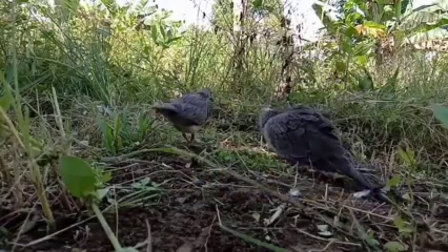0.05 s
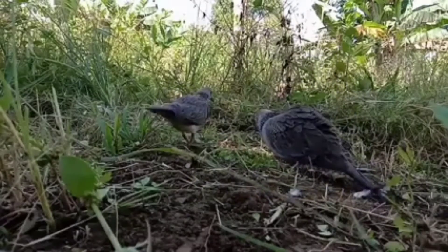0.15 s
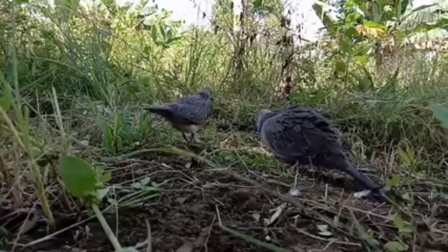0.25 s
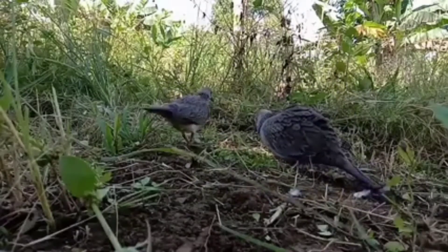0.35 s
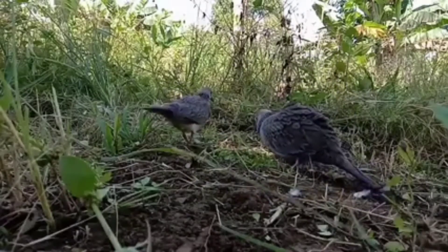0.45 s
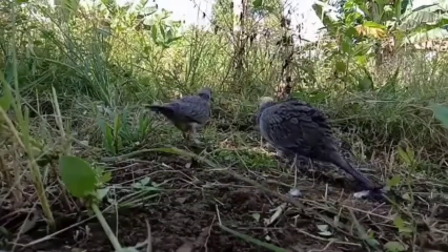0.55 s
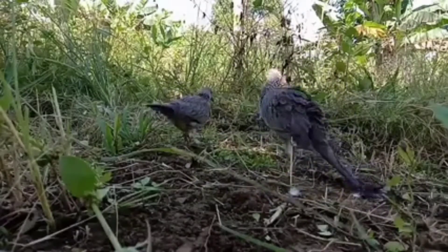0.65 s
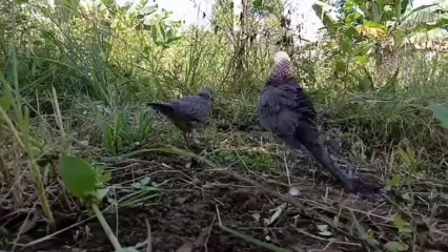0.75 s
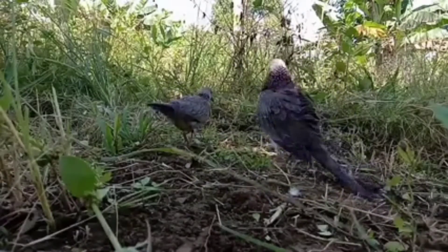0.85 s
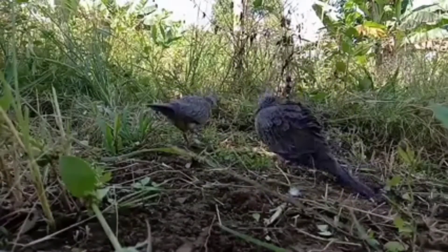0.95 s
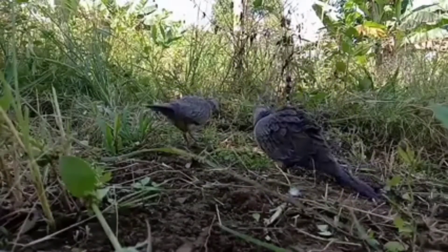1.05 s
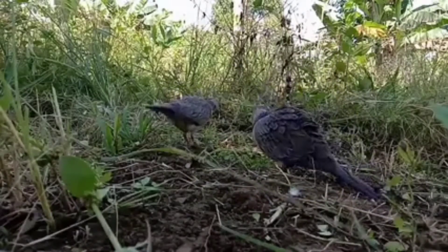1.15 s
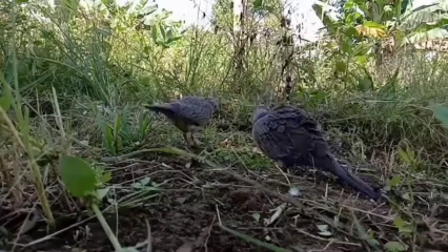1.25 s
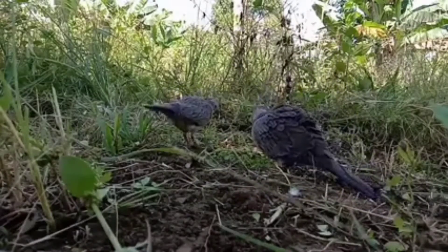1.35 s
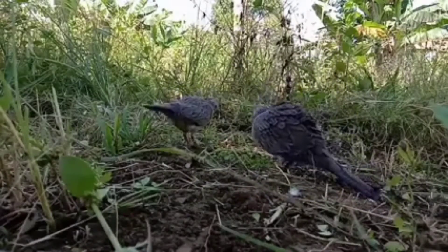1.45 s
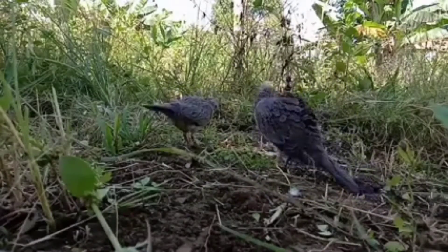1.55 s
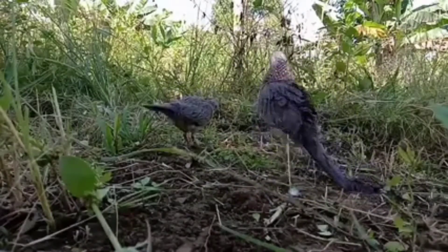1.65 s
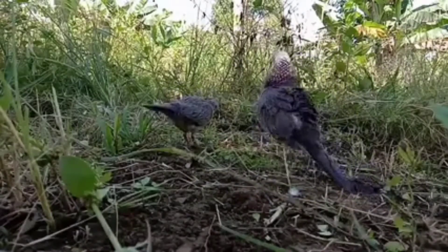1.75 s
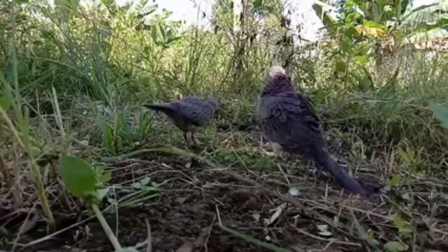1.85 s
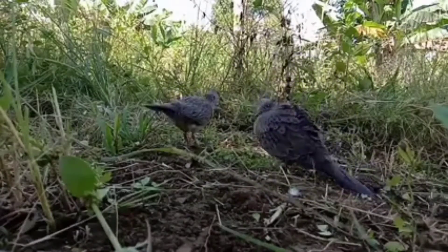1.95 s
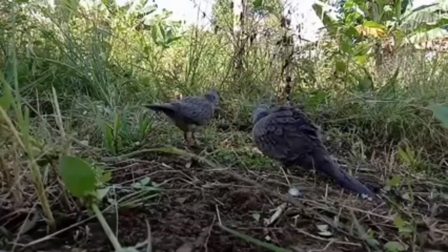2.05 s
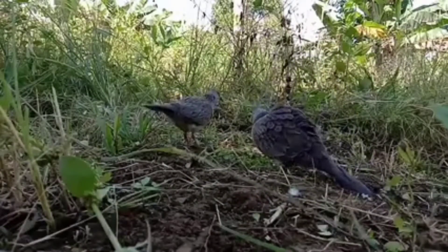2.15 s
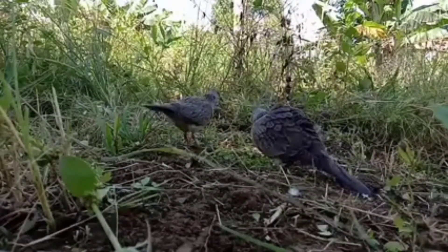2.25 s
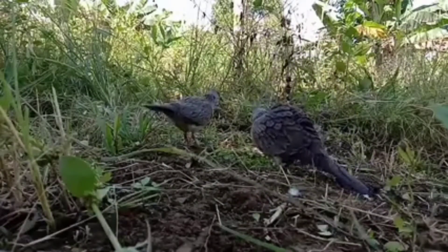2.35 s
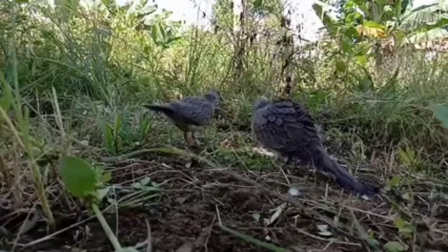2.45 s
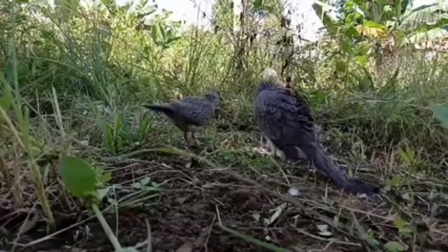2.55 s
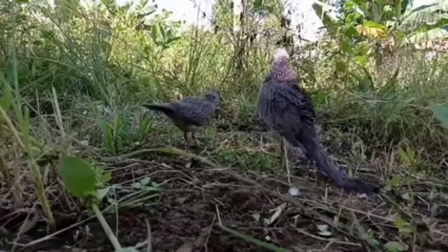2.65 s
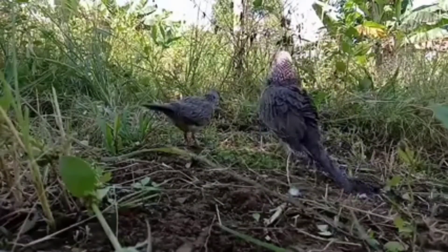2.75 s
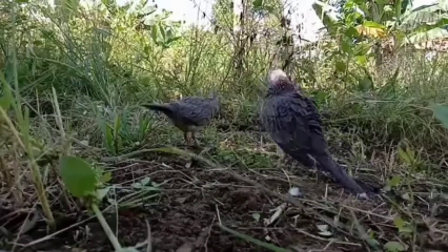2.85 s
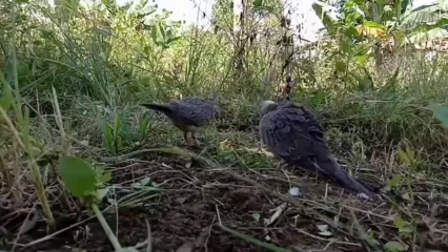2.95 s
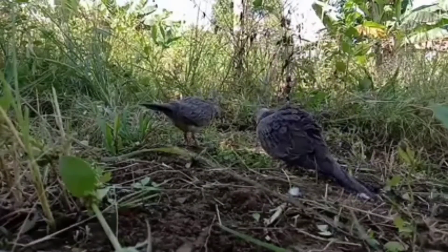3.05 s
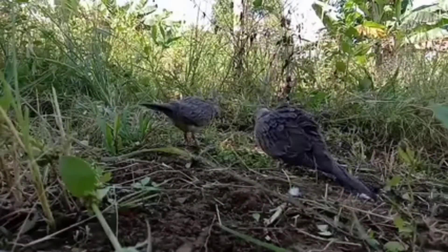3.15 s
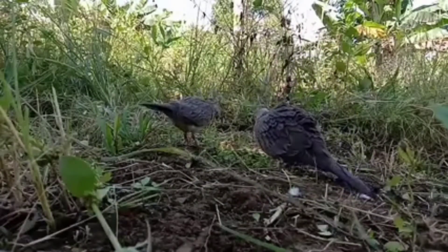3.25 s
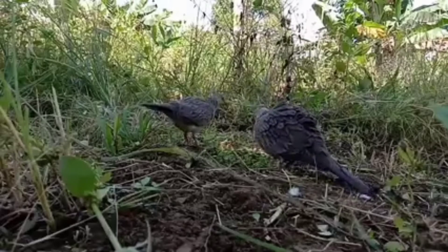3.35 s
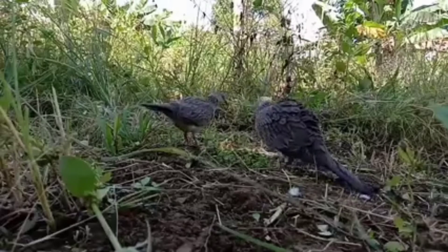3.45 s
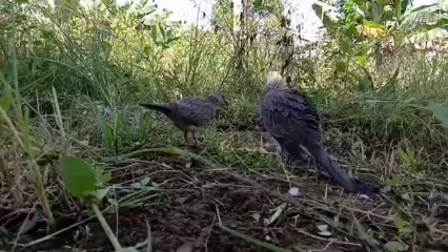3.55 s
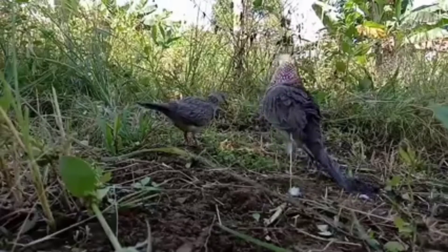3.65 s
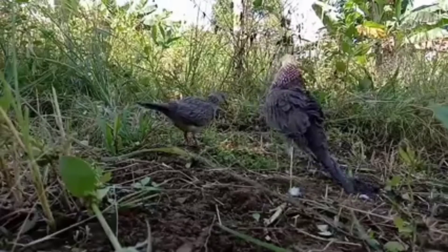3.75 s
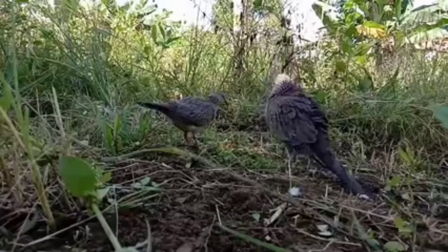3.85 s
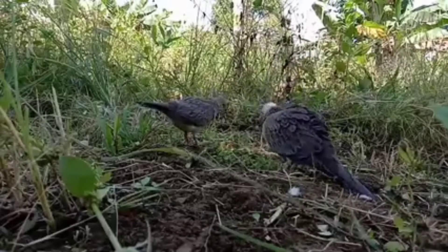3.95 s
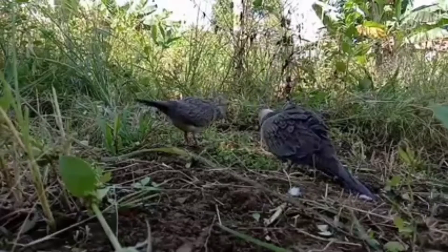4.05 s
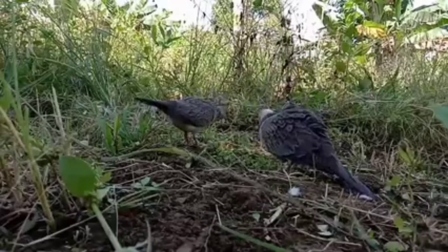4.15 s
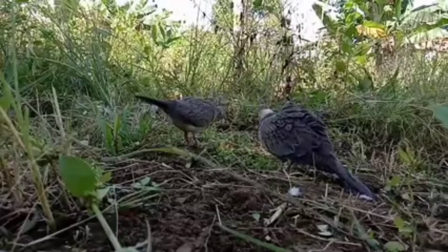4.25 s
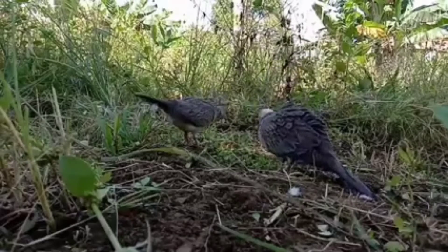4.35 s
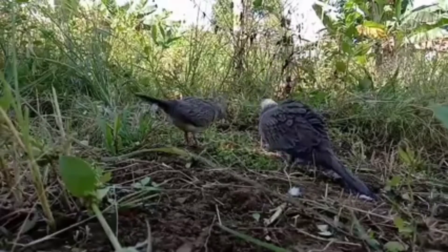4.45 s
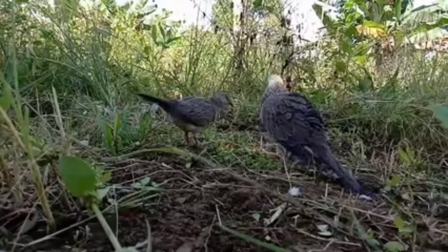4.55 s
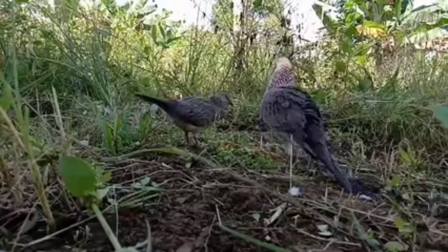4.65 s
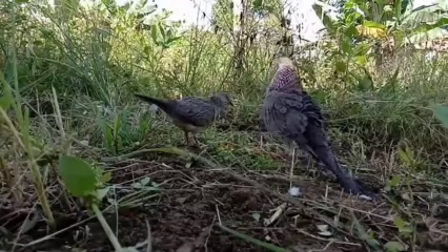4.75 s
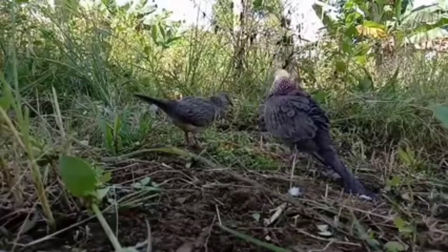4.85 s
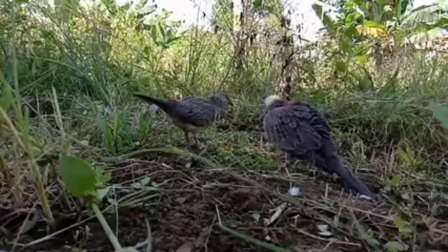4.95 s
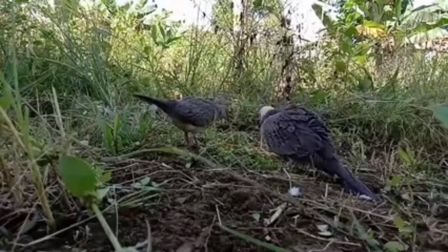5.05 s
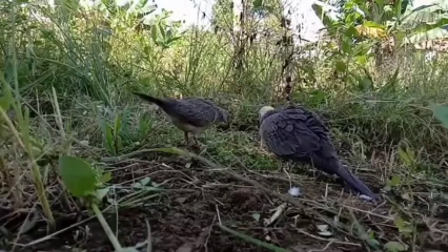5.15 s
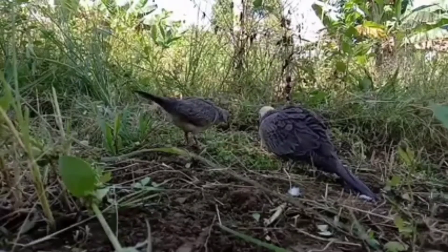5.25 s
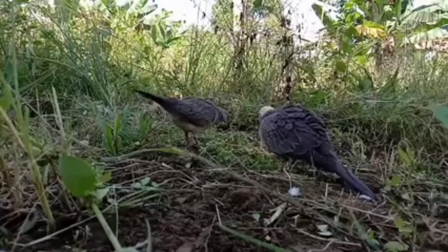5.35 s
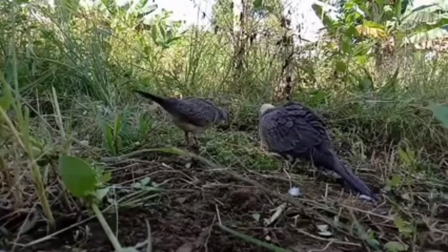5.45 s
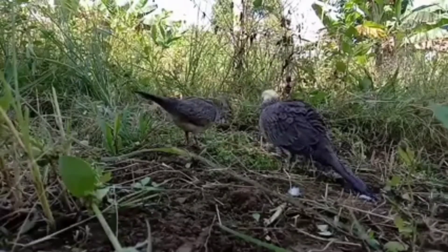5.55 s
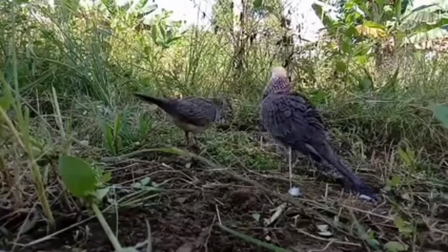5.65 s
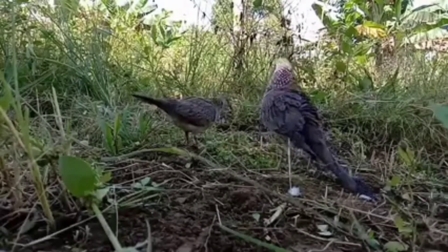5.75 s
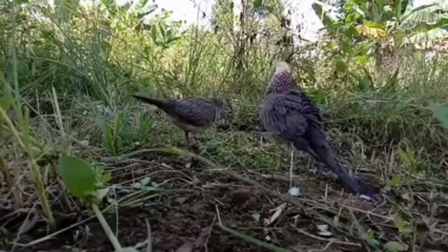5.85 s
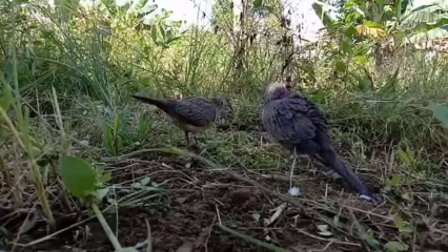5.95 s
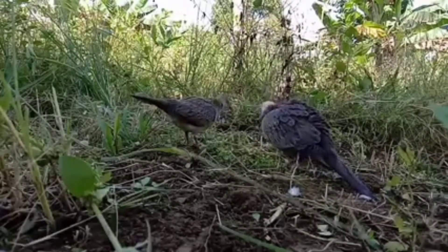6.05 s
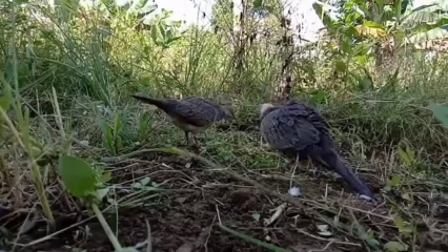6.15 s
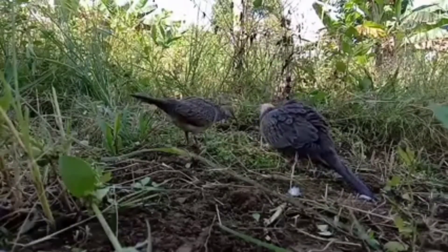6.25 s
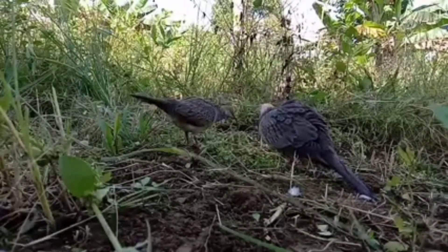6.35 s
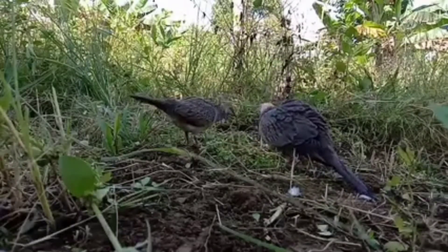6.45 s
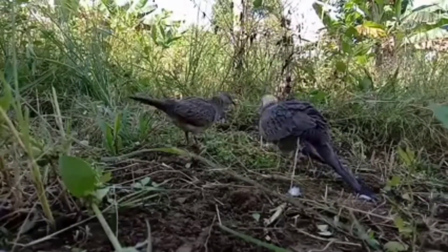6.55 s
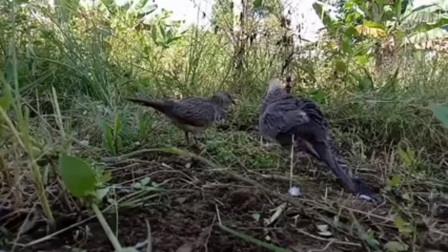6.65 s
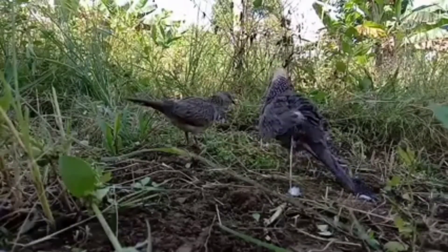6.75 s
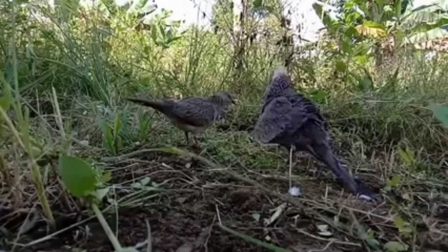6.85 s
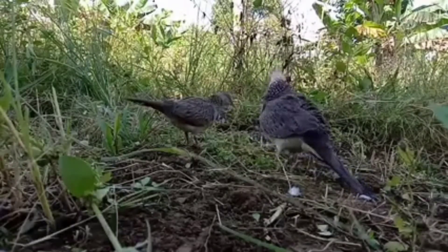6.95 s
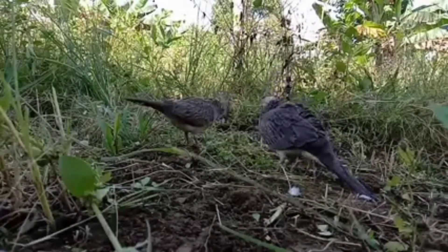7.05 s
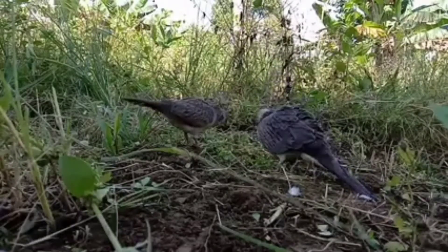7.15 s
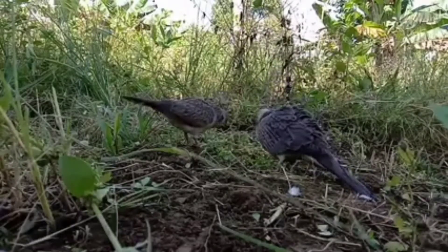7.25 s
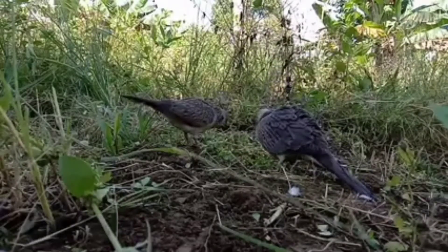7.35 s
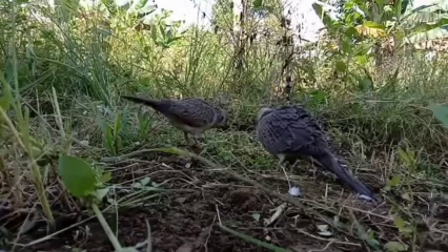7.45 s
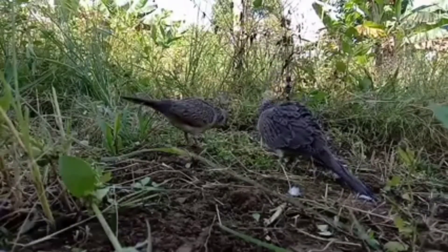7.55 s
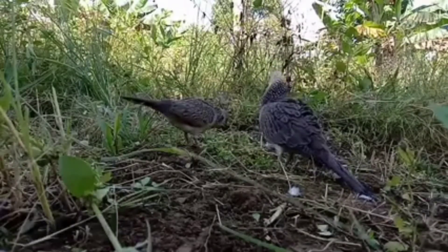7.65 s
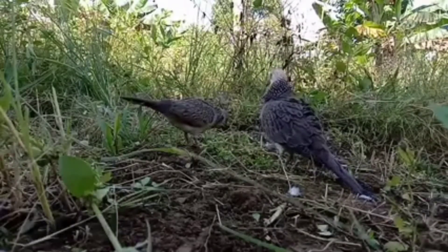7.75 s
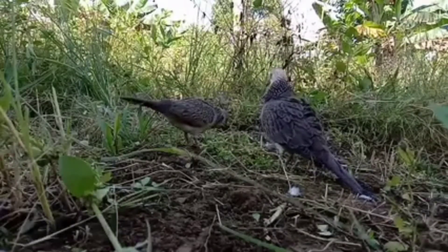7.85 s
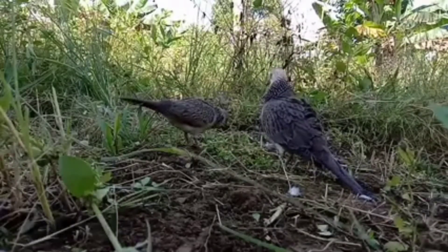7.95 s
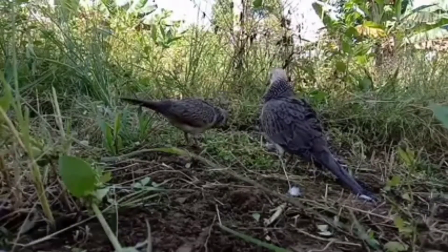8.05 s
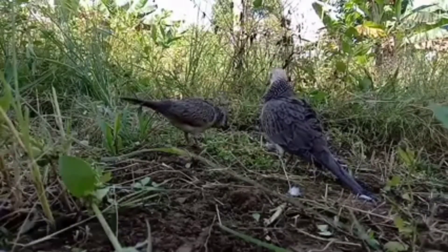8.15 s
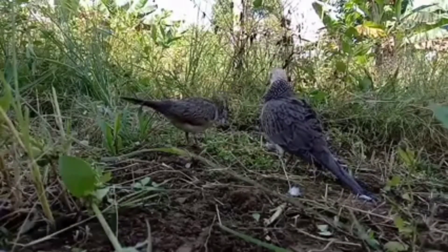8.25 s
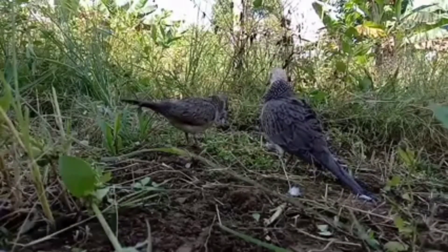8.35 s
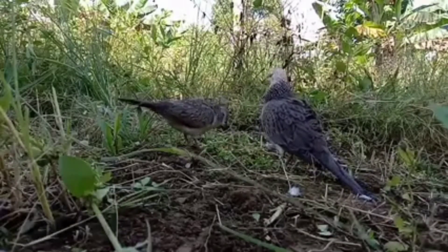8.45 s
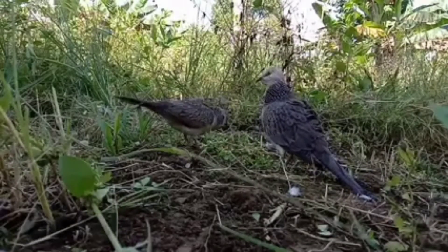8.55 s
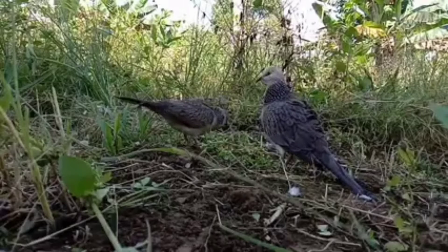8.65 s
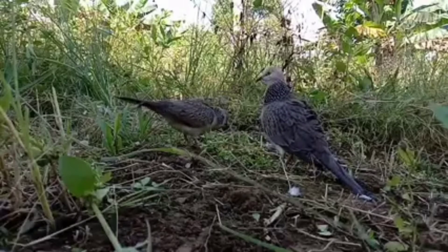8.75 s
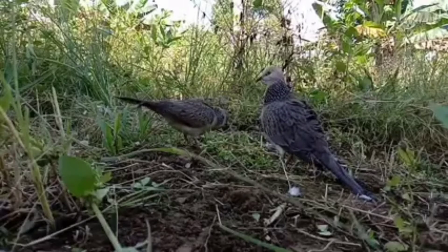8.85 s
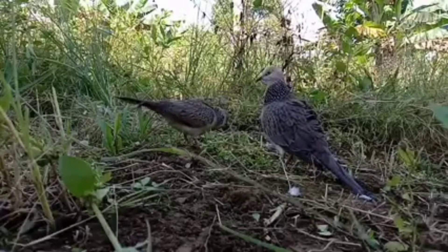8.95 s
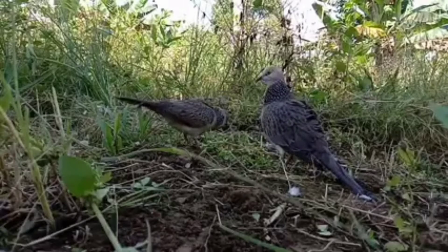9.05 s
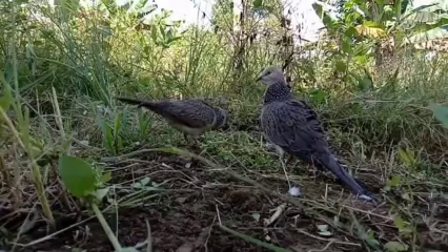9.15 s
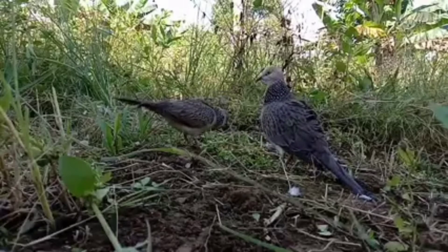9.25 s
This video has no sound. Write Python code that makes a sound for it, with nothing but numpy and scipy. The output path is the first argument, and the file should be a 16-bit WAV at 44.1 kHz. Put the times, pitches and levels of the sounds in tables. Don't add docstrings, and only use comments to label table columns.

```python
import sys
import numpy as np
from scipy import signal
from scipy.fft import rfft, irfft, next_fast_len
from scipy.io import wavfile
from scipy.ndimage import uniform_filter1d, map_coordinates

SR = 44100
rng = np.random.default_rng(int(sys.argv[2]) if len(sys.argv) > 2 else 0)


def nominal_scale(level):
    x = np.asarray(level, float) / 20
    return 10 ** x


def store_pcm(level_fs):
    pcm = np.round(np.clip(level_fs, -1, 1) * 32767).astype(np.int16)
    wavfile.write(sys.argv[1], SR, np.atleast_2d(pcm).T)


N = 410571


def unit(x):
    return x / np.sqrt(np.mean(np.abs(x) ** 2) + 1e-20)


def along(points, hz):
    f, v = np.transpose(points)
    return np.interp(np.log(hz + 1), np.log(f + 1), v)


def span(rows):
    s, *columns = np.transpose(rows)
    first = round(s[0] * SR)
    t = np.arange(first, min(round(s[-1] * SR), N)) / SR
    return first, [np.interp(t, s, column) for column in columns]


def wobble(rate, size=N):
    knots = rng.standard_normal(int(size * rate / SR) + 4)
    return map_coordinates(knots, [np.arange(size) * rate / SR])


def filtered(x, response):
    m = next_fast_len(len(x) + SR // 4)
    return irfft(rfft(x, m) * response(np.fft.rfftfreq(m, 1 / SR)), m)[:len(x)]


def modes(table):
    def response(f):
        total = 0
        for k, (hz, width, db) in enumerate(table):
            ring = 1j * f * width / (hz * hz - f * f + 1j * f * width)
            total = total + (-1) ** k * nominal_scale(db) * ring
        return total
    return response


def fade(size, s):
    edge = np.minimum(np.arange(size), np.arange(size)[::-1]) / (s * SR)
    return np.clip(edge, 0, 1)


def through_leaves(x, window, tall, wide, depth_db, offset_db=0):
    z = signal.stft(x, nperseg=window)[2]
    field = uniform_filter1d(rng.standard_normal(z.shape), size=tall, axis=0)
    field = uniform_filter1d(field, size=wide, axis=1)
    return signal.istft(z * nominal_scale(depth_db * unit(field) + offset_db), nperseg=window)[1][:N]


# time in seconds, level in dB.
ROAD_LEVEL = [(0.0, -63.5), (0.31, -69.5), (5.861, -68.5), (9.31, -62)]
# frequency in Hz, strength in dB per Hz.
ROAD_COLOUR = [(15, -49.5), (25, -16), (32, -24), (43, -16), (73, -3), (102, 6.5), (135, -3), (162, 0.5),
               (227, -17), (270, -27), (300, -20), (390, -49.5), (660, -120)]
# frequency in Hz, strength in dB per Hz.
AIR_COLOUR = [(140, -39.5), (230, -11.5), (380, 0), (620, -7), (900, -2), (1300, -9), (1600, -13),
              (2800, -14), (4300, -19.5), (6100, -21), (8200, -22.5), (8800, -30.5), (12000, -28.5),
              (15500, -27)]
# time in seconds, level in dB.
AIR_LEVEL = [(0, -69), (7.5, -68.5), (9.31, -69)]
# pitch in Hz, width in Hz, level in dB, flicker in dB.
INSECTS = [
    (5790, 63, -85.5, 3),
    (7420, 400, -89, 1.4),
    (1267, 20, -79.5, 4),
    (1765, 250, -84.5, 2.5),
    (14800, 1100, -94.5, 2.5),
]


def ground():
    _, (road_db,) = span(ROAD_LEVEL)
    _, (air_db,) = span(AIR_LEVEL)
    road = unit(filtered(rng.standard_normal(N), lambda f: nominal_scale(along(ROAD_COLOUR, f))))
    air = unit(filtered(rng.standard_normal(N), lambda f: nominal_scale(along(AIR_COLOUR, f))))
    air = unit(through_leaves(air, window=512, tall=7, wide=16, depth_db=4.5))
    out = nominal_scale(road_db + 4.0 + 2.2 * wobble(3.7) + 2.5 * wobble(8.6)) * road
    out += nominal_scale(air_db + 0.29 * wobble(2.4)) * air
    for hz, width, db, flicker_db in INSECTS:
        line = unit(filtered(rng.standard_normal(N), lambda f: modes([(hz, width, 0)])(f) ** 2))
        out += nominal_scale(db + flicker_db * (1.1 * wobble(3.3) + wobble(30))) * line
    return out


# frequency in Hz, seconds to die by 60 dB.
SCRUB_ECHO = [(300, 0.45), (1000, 0.37), (3000, 0.23), (8000, 0.083)]


def echo(x):
    hz, t, z = signal.stft(rng.standard_normal(SR // 2), SR, nperseg=256)
    dying = nominal_scale(-60 * t / along(SCRUB_ECHO, hz)[:, None])
    tail = signal.istft(z * dying, SR, nperseg=256)[1]
    late = np.pad(x, (500, 0))
    return signal.fftconvolve(late, tail / np.linalg.norm(tail))[:N]


# start in seconds, rise in seconds, fall in seconds, level in dB, mouth resonance in Hz.
THIN_RASPS = [
    (.13, 0.02, 0.038, -60.5, 5260),
    (.75, .038, 0.055, -58, 5370),
    (1.41, 0.02, 0.077, -52, 5250),
]
BROAD_RASPS = [
    (1.83, .06, 0.03, -51.5, 5200),
    (1.96, .072, 0.057, -51.5, 5020),
    (2.74, .028, 0.07, -71, 4520),
    (4.81, .015, .075, -68.5, 4680),
    (6.36, .06, .03, -76.5, 5700),
    (8.31, 0.055, 0.047, -73.5, 5000),
]
HARSH_RASPS = [
    (2.18, .036, .114, -58, 4800),
    (4.29, 0.05, 0.064, -55.5, 5090),
    (4.53, 0.036, .082, -60.5, 5340),
    (5.955, 0.027, .117, -50.5, 4740),
    (7.08, .056, 0.074, -50.5, 4740),
    (8.95, .038, 0.049, -51, 5260),
]
# share of the mouth resonance, width in Hz, level in dB.
THIN_MOUTH = [(.935, 324, 0.5), (1.092, 420, -.3)]
BROAD_MOUTH = [(.85, 703, -3), (1.001, 601.7, -2.5), (1.171, 699, -4)]
HARSH_MOUTH = [(0.839, 634, -5), (1.002, 448, 1.3), (1.1, 330, -1.5)]
# frequency in Hz, width in Hz, level in dB.
THIN_MIDDLE = [(3000, 250, .2)]
HARSH_MIDDLE = [(2720, 450, -4), (3650, 600, -0.9)]
# frequency in Hz, width in Hz, level in dB.
THROAT = [
    [(2970, 270, 3), (3730, 990, -2.5)],
    [(1740, 190, 1), (2256, 290, 1)],
    [(6970, 700, 0), (9800, 2400, -5), (13500, 2500, -9)],
]


def rasps():
    broad_middle, low, top = THROAT
    # dB of the throat's middle, low and top against the mouth
    birds = [(THIN_RASPS, THIN_MOUTH, THIN_MIDDLE, (-8, -14.5, -23)),
             (BROAD_RASPS, BROAD_MOUTH, broad_middle, (1.5, -3.8, -10.5)),
             (HARSH_RASPS, HARSH_MOUTH, HARSH_MIDDLE, (-8.5, -5.5, -26.5))]
    out = np.zeros(N)
    for table, bands, middle, throat_db in birds:
        for s, rise, fall, peak_db, mouth_hz in table:
            at, (level_db,) = span([(s, peak_db - 18), (s + rise, peak_db), (s + rise + fall, peak_db - 13.5)])
            size = len(level_db)
            flutter = np.cumsum(190 * (1 + 0.23 * wobble(50, size))) / SR
            breath = (.5 + np.cos(np.pi * flutter) ** 4) * rng.standard_normal(size)
            mouth = [(share * mouth_hz, width, db) for share, width, db in bands]
            for group, db in zip([mouth, middle, low, top], [0, *throat_db]):
                shape = modes([(hz * rng.normal(1, .015), width, gain + rng.normal(0, .9))
                               for hz, width, gain in group])
                part = unit(filtered(breath, lambda f: shape(f) ** 2))
                part_db = level_db + db + 1.8 * wobble(60, size)
                out[at:at + size] += nominal_scale(part_db) * part * fade(size, .012)
    return through_leaves(out, window=256, tall=3, wide=7, depth_db=3.2, offset_db=-1.3)


# start in seconds, length in seconds, first pitch in Hz, top pitch in Hz,
# level in dB.
LEAD_NOTES = [
    (0, 0.048, 2970, 3180, -53),
    (0.584, 0.036, 2840, 3110, -63),
    (1.293, 0.029, 2870, 2850, -51),
    (2.94, 0.077, 2810, 3180, -67.5),
    (4.181, 0.032, 2979, 3124, -61),
    (5.776, 0.048, 2600, 2890, -68),
    (6.918, 0.044, 2540, 2700, -63.5),
    (7.803, 0.072, 2870, 3016, -56),
    (8.855, .07, 2931, 3170, -51.5),
]
MAIN_NOTES = [
    (.045, 0.09, 3070, 3310, -62),
    (0.619, 0.038, 2970, 3315, -66),
    (1.329, 0.05, 3010, 3300, -61.5),
    (3.011, .03, 3270, 3250, -69),
    (4.215, .035, 3230, 3190, -66),
    (5.82, 0.066, 3000, 3186, -54.5),
    (6.954, 0.042, 2970, 3170, -54),
    (7.851, 0.1, 2955, 3180, -54),
    (8.919, .065, 3150, 3160, -64),
]
CHIPS = [(1.295, .04, 5750, 5790, -59.5), (2.94, 0.094, 5660, 5800, -65.5),
         (4.155, 0.031, 5130, 5250, -64.5), (4.66, 0.057, 1860, 1786, -65),
         (5.78, 0.067, 5400, 5750, -62.5), (6.925, .065, 5520, 5552, -62),
         (7.805, 0.057, 5600, 5830, -65.5), (7.91, .05, 6384, 5900, -69.5),
         (8.276, 0.037, 3930, 4000, -70.5), (4.815, 0.034, 2250, 2150, -66.5),
         (8.36, 0.02, 2190, 2090, -64), (8.66, 0.04, 4006, 4020, -69.5), (8.855, 0.05, 5620, 5740, -64),
         (8.89, 0.074, 6090, 5980, -68), (9.15, .03, 4170, 4150, -67)]
PEEPS = [(.06, .05, 4930, 5050, -78.5), (0.599, 0.059, 5850, 5800, -75.5), (1.285, 0.018, 4930, 5000, -69),
         (1.335, 0.051, 4940, 5100, -70.5), (4.179, .06, 5840, 5600, -76), (4.46, .03, 2886, 2900, -77),
         (5.81, .05, 4400, 4700, -76), (6.32, 0.077, 3000, 2840, -78), (6.35, .06, 4360, 4460, -77.5),
         (6.97, 0.033, 3370, 3650, -62), (8.41, 0.21, 3110, 2945, -77), (8.88, .06, 4600, 4640, -76.5),
         (8.87, .045, 9200, 9300, -78), (8.95, 0.038, 3450, 3250, -59)]
# share of the length, share of the glide to the top pitch, dB against the level.
LEAD_SHAPE = [(0, 0.013, -12.5), (.6, .6, -2), (1, 0.93, -3.1)]
MAIN_SHAPE = [(0, 0.12, -1), (.4, 1.01, -2), (1, 0.73, -19.5)]
CHIP_SHAPE = [(0, 0, -8), (.45, .9, -1.2), (1, .7, -9)]


def whistles():
    out = np.zeros(N)
    kinds = [(LEAD_SHAPE, LEAD_NOTES), (MAIN_SHAPE, MAIN_NOTES), (CHIP_SHAPE, CHIPS), (CHIP_SHAPE, PEEPS)]
    for shape, table in kinds:
        for s, length, first_hz, top_hz, note_db in table:
            at, (hz, level_db) = span([(s + u * length, first_hz + glide * (top_hz - first_hz), note_db + db)
                                       for u, glide, db in shape])
            size = len(hz)
            hoarse = 1 + .014 * wobble(80, size) + .016 * wobble(500, size)
            turns = np.cumsum(hz * hoarse) / SR
            tremble_db = 2.9 * wobble(110, size) + 1.1 * wobble(370, size)
            tone = np.sin(2 * np.pi * turns) * fade(size, 0.0043)
            out[at:at + size] += nominal_scale(level_db + 6.5 + tremble_db) * tone
    return out


def bursts(beat, turns, start, size, fall, rise):
    k, u = beat.astype(int), np.pi / 2 * (beat % 1)
    going = size[k] * np.cos(u) ** fall * np.sin(2 * np.pi * turns + start[k])
    coming = size[k + 1] * np.sin(u) ** rise * np.sin(2 * np.pi * turns + start[k + 1])
    return going + coming


def shaped(shape, at, stretch, level_db, hz):
    return [(at + s * stretch, level_db + db, hz * share) for s, db, share in shape]


# multiple of the pitch, level in dB, sharpness of the burst.
OVERTONES = [(1.3, 7.5, 10), (1.6, 0, 5), (1.85, 2, 2.7), (2.02, -6.5, 5.2)]


def add_coo(out, rows, rate, last_rate, over_db, third_db):
    ends = np.array([rows[0], rows[-1]]) + [(-.0085, -12.5, -29.5), (.006, -30, 1)]
    at, (level_db, hz) = span([ends[0], *rows, ends[1]])
    size = len(hz)
    left = np.arange(size)[::-1] / SR
    pace = np.interp(left, [.03, .17], [last_rate, rate])
    beat = .6 + np.cumsum(pace * (1 + .04 * wobble(90, size))) / SR
    climb = 1 + 0.035 * np.sin(2 * np.pi * (beat + 0.043)) + 0.016 * wobble(60, size)
    turns = np.cumsum(hz * climb) / SR
    chance = rng.standard_normal((100, 8))
    strength = nominal_scale(-1.3 * np.abs(chance[:, 0]))
    slip = np.cumsum(-2.3 + 1.2 * 120 / rate * chance[:, 1])
    slow = (120 / pace) ** 2.2
    tone = unit(bursts(beat, turns, slip, strength, fall=4.18 * slow, rise=2.23 * slow))
    flare = np.zeros(size)
    for i, (multiple, db, sharp) in enumerate(OVERTONES):
        flare += nominal_scale(db) * bursts(beat + 0.4, multiple * turns, 9 * chance[:, 2 + i], strength, sharp, sharp)
    third = bursts(beat, 3 * turns, 3 * slip, strength, fall=2.5, rise=2.5)
    age = np.arange(size) / SR - .027
    push = -age / .0025 * np.exp(-.5 * (age / 0.0023) ** 2)
    voice = nominal_scale(-32.5) * push + tone + nominal_scale(over_db) * unit(flare) + nominal_scale(third_db) * unit(third)
    onset = np.clip(np.arange(size) / (0.0029 * SR), 0, 1)
    out[at:at + size] += nominal_scale(level_db + 1.4) * voice * onset


# start in seconds, length in seconds, level in dB, pitch in Hz, swell in seconds.
FAR_COOS = [
    (7.721, 0.52, -26.5, 633.4, .1),
    (8.606, 0.16, -27.5, 618.5, .04),
    (8.948, .52, -24.5, 636.7, .055),
]
# share of the swell, dB against its level, share of its pitch.
FAR_RISE = [(-.1, -23, .9), (0, -21, .89), (.33, -5, .925), (1, -.5, 1.003)]
# share of the length, dB against its level, share of its pitch.
FAR_SAG = [(.55, -0.4, 0.98), (.82, -2, 0.94), (.975, -5.5, .9), (1.01, -22.5, .885), (1.12, -35.5, .88)]


def far_dove():
    out = np.zeros(N)
    for s, length, db, hz, swell in FAR_COOS:
        rows = shaped(FAR_RISE, s, swell, db, hz) + shaped(FAR_SAG, s, length, db, hz)
        throb = 129 if length > .3 else 105
        add_coo(out, rows, throb, throb, over_db=-32.5, third_db=-51)
    return out


# start in seconds, length in seconds, level in dB, pitch in Hz, closing pitch in Hz.
SHORT_COOS = [
    (0.156, 0.15, -21, 670, 675.8),
    (1.12, 0.15, -20.5, 662, 666.7),
    (2.114, 0.15, -21, 662, 653.6),
    (3.088, 0.16, -21.5, 665, 658.4),
    (4.097, 0.15, -21, 661, 656),
    (5.136, .15, -21, 649.4, 661.5),
    (6.167, 0.15, -21.5, 665.4, 655),
    (7.248, 0.15, -21, 668, 641.6),
]
LONG_COOS = [
    (.427, .37, -21, 674, 672.4),
    (1.387, 0.37, -21, 685, 683.5),
    (2.377, 0.37, -21, 677.3, 677.6),
    (3.354, 0.38, -21, 675.7, 688),
    (4.355, .355, -21, 676, 678.6),
    (5.388, 0.3483, -21, 671.5, 683),
    (6.426, 0.33, -20.5, 676, 690),
]
# seconds after its start, dB against its level, share of its pitch.
SHORT_RISE = [(.001, -16, .915), (.007, -5.5, .925), (.018, 0.8, .97), (.055, -0.33, 1.03)]
LONG_RISE = [(-.005, -14, .96), (.002, -15.5, .9), (.009, -11.5, .82), (.021, -2, .875), (.045, 0.2, .94),
             (.11, 0.52, 1.005)]
# seconds around its end, dB against its level, share of its closing pitch.
SHORT_FALL = [(-.04, 1.1, .985), (-.005, -0.4, 0.96), (.003, -15, .92), (.014, -20.5, .91)]
LONG_FALL = [(-.055, -0.04, 0.95), (-.02, -1.7, .915), (-.004, -3.5, .89), (.003, -12, .88),
             (.014, -20.5, .88)]
# time in seconds, level in dB, pitch in Hz.
BROKEN_COO = [
    (7.405, -36, 580),
    (7.432, -38, 527),
    (7.497, -42, 599),
    (7.543, -22.5, 602),
    (7.566, -21, 624),
    (7.59, -25.5, 612),
    (7.618, -33, 536),
    (7.624, -43.5, 546),
]


def bowing_dove():
    out = np.zeros(N)
    bright = dict(over_db=-23.5, third_db=-63.5)
    for s, length, db, hz, last_hz in SHORT_COOS:
        rows = shaped(SHORT_RISE, s, 0.94, db, hz) + shaped(SHORT_FALL, s + length, 0.95, db, last_hz)
        throb = 105.5 - 1.15 * s
        add_coo(out, rows, throb, throb, **bright)
    for s, length, db, hz, last_hz in LONG_COOS:
        rows = shaped(LONG_RISE, s, 0.94, db, hz) + shaped(LONG_FALL, s + length, 0.95, db, last_hz)
        add_coo(out, rows, 122.3 - .75 * s, 111 - 1.9 * s, **bright)
    add_coo(out, BROKEN_COO, 98, 76, **bright)
    return out


def scene():
    birds = whistles() + rasps()
    doves = far_dove() + bowing_dove()
    mix = ground() + nominal_scale(1.0) * birds + nominal_scale(-9) * echo(birds)
    mix += doves + nominal_scale(-35.5) * echo(doves)
    return mix[None]


def band_limit(x):
    return signal.sosfilt(signal.butter(12, 15450, fs=SR, output="sos"), x)


def record(dry):
    hz, _, z = signal.stft(dry, SR, nperseg=2048)
    band = (hz > 8800) & (hz < 10300)
    all_db = 10 * np.log10(np.sum(np.abs(z) ** 2, axis=1) + 1e-20)
    band_db = 10 * np.log10(np.sum(np.abs(z[:, band]) ** 2, axis=1) + 1e-20)
    lost = (all_db > -40) & (band_db < -88)
    z = z * np.where(band[:, None] & lost[:, None], nominal_scale(-16.5), 1)
    mix = signal.istft(z, SR, nperseg=2048)[1][:, :N]
    return band_limit(mix)


dry = scene()
out = record(dry)
store_pcm(out)
```